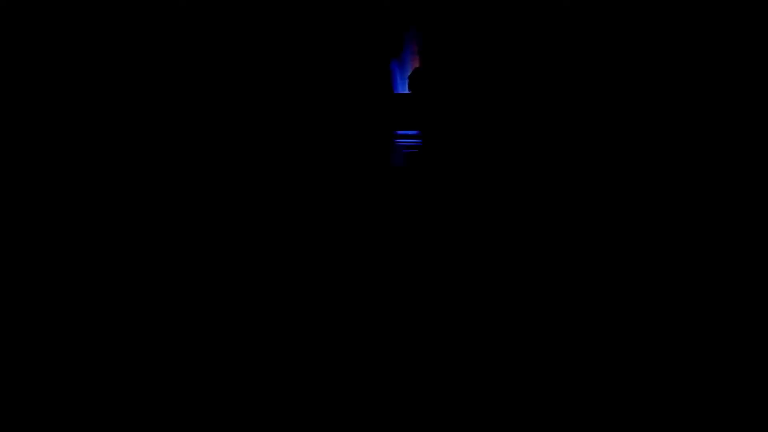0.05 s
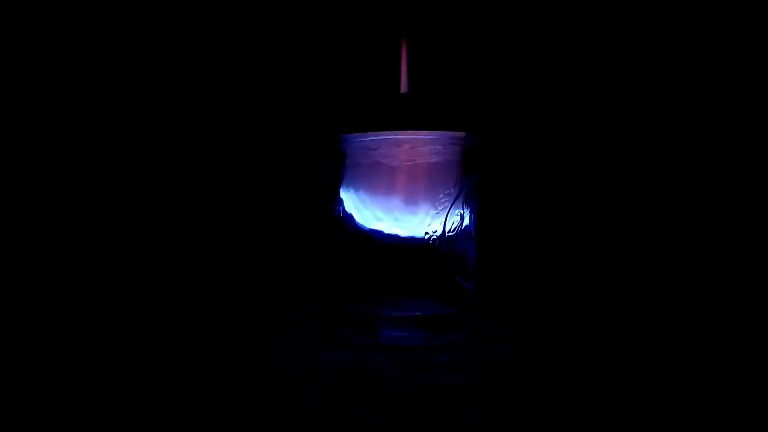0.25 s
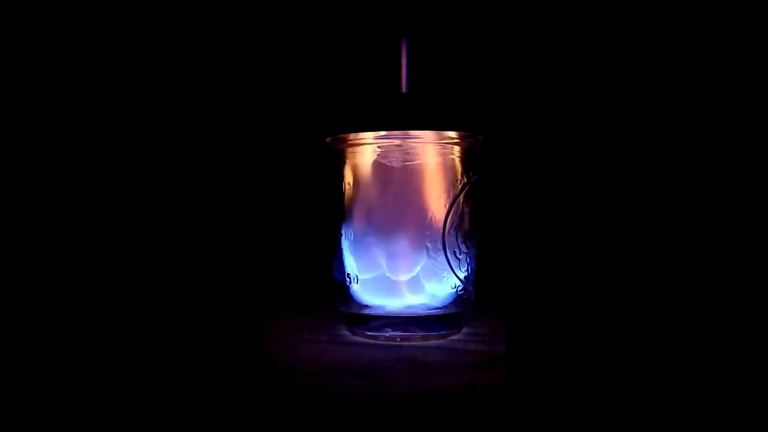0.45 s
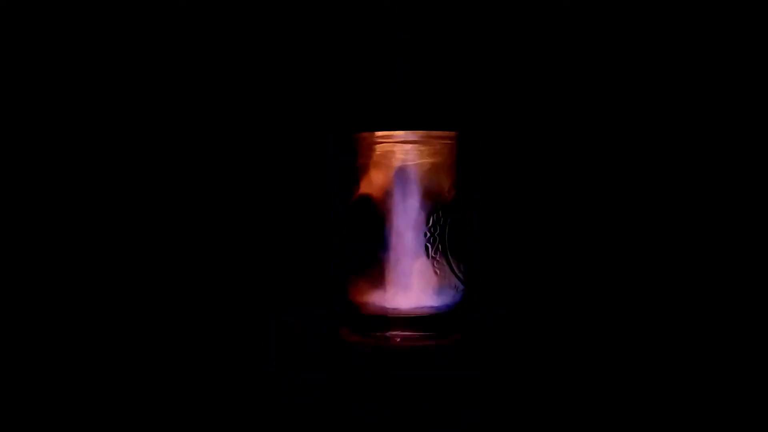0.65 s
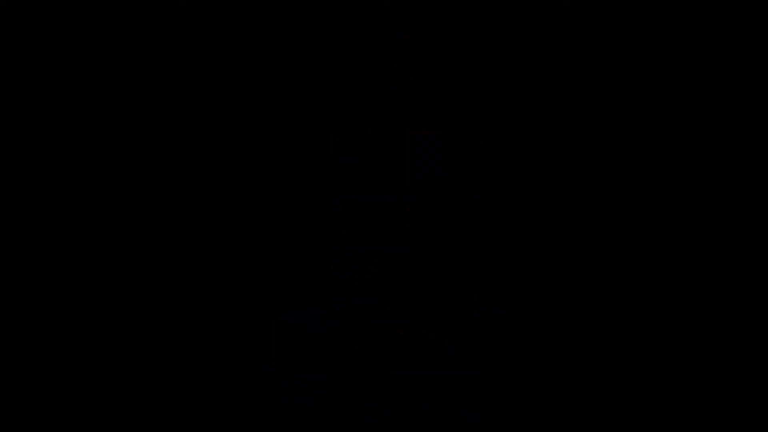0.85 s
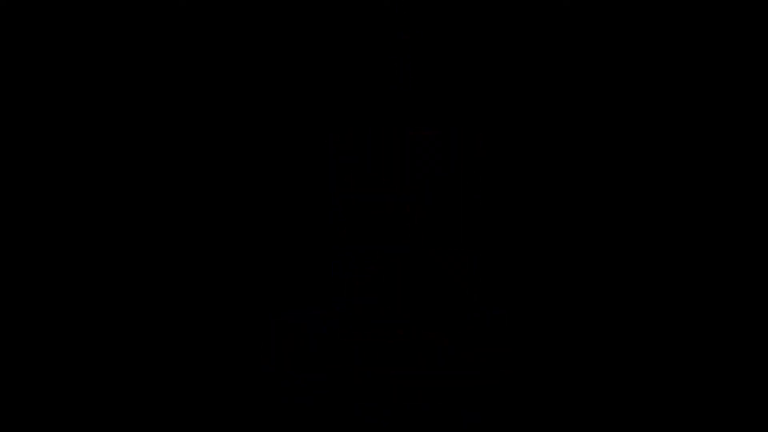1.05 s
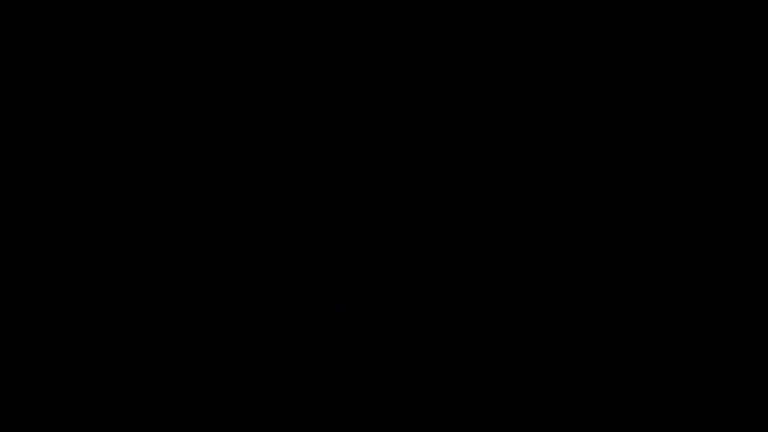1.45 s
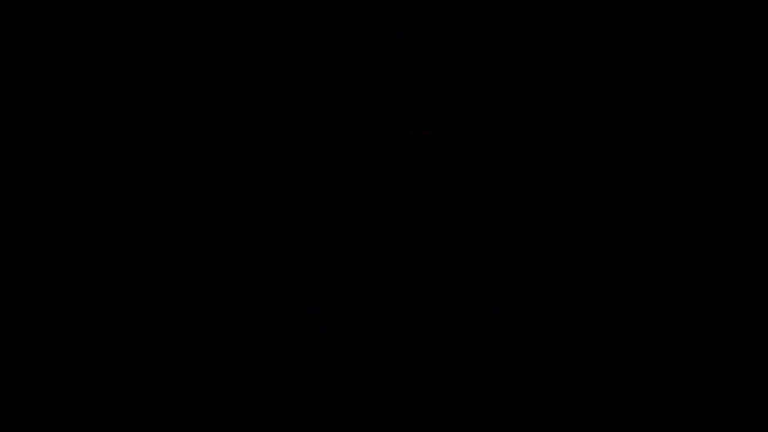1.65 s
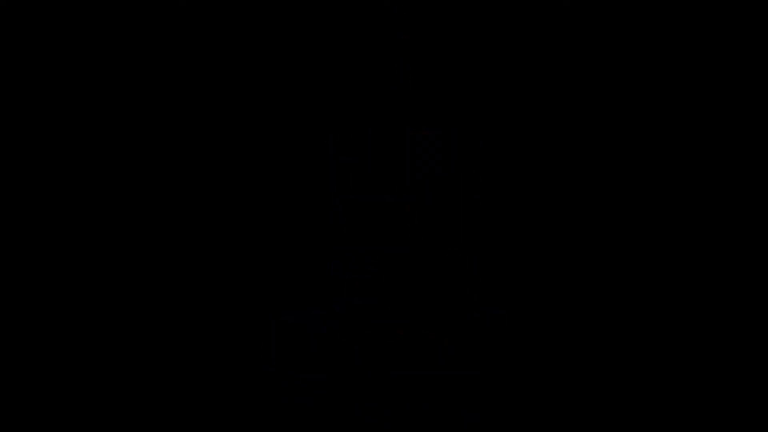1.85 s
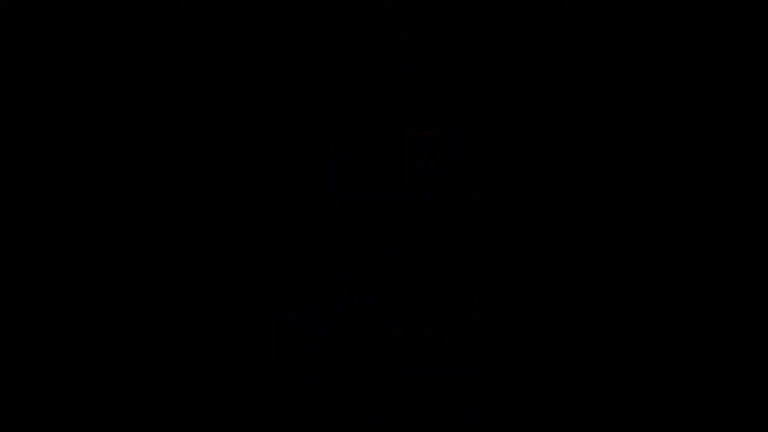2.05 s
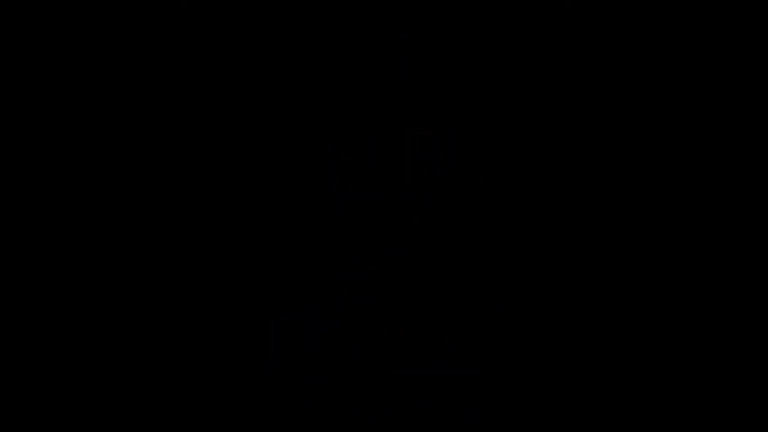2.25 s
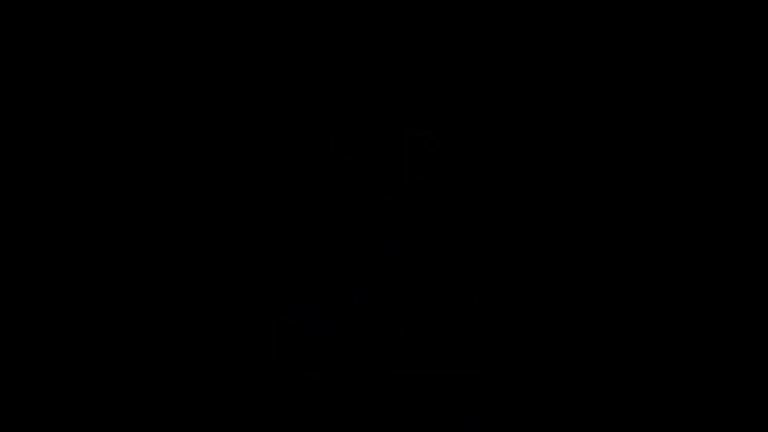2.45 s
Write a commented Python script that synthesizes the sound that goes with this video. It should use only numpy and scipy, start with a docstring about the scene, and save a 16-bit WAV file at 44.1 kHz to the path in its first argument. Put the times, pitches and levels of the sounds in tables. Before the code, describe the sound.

Close up in a quiet room, a flame whooshes out of a glass jar, roaring and hissing, then ends in a brief low hoot. The glass ticks faintly and air thumps and rumbles on the right microphone.

```python
"""Vapour ignites in a glass jar, close to a stereo recorder. The flame runs down the jar and drives a
roaring, hissing jet out of the mouth; the air in the jar then flutters, hoots in one arch of pitch and
rings out, and the cooling glass ticks. Puffs of air buffet the right microphone, mostly after the burn.
Behind it all lies a faint room hum that ducks under loud sound. The microphones are narrow-band and
feed a fast limiter."""
import sys
import numpy as np
from scipy import signal
from scipy.fft import rfft, irfft
from scipy.io import wavfile
from scipy.ndimage import uniform_filter1d, minimum_filter1d, map_coordinates

SR = 44100
rng = np.random.default_rng(int(sys.argv[2]) if len(sys.argv) > 2 else 0)


def transcribe(signal):
    """Save signal, clipped to [-1, 1], as a 16-bit WAV file at the path in sys.argv[1]."""
    frames = np.atleast_2d(signal).T
    limited = np.clip(frames, -1, 1)
    pcm = np.round(limited * 32767).astype(np.int16)
    wavfile.write(sys.argv[1], SR, pcm)


N = 110250

# spectra of the room tone and its high hiss: f/Hz, relative level/dB
ROOM_SPECTRUM = [(50, 0), (140, 1), (220, -14), (380, -13.5), (520, -26.5), (660, -12), (950, -28),
                 (1200, -18), (1450, -6), (1650, -8), (1900, -46), (5000, -34)]
AIR_SPECTRUM = [(1800, -26), (2500, -9.5), (3200, 1), (4200, 3), (5000, -3.5)]
# puffs on the microphone: t/s, thump f/Hz, thump level/dB, thump decay/s,
# rustle level/dB, rustle attack/s, rustle decay/s, tick level/dB
MIC_PUFFS = [(0.226, 105.6, -15, 0.019, -53, .01, 0.023, -61),
             (1.036, 58.4, -14, 0.3, -21.5, 0.015, 0.061, -40),
             (1.617, 82.8, -0.5, 0.019, -13.5, 0.0052, 0.02, -27),
             (1.673, 169, -4, 0.012, -17.5, 0.0043, 0.013, -63.5),
             (1.753, 47.8, -5.5, 0.043, -10, 0.00088, 0.011, -27),
             (1.82, 188, -9, 0.076, -37.5, 0.0067, 0.022, -66),
             (1.881, 56.2, -4.5, 0.058, -17.5, 0.0049, 0.0052, -47),
             (2.012, 89.7, -16.5, 0.053, -22, 0.014, 0.046, -59),
             (2.062, 84, -10, 0.049, -15.5, 0.003, 0.013, -63),
             (2.105, 36.35, -10, 0.13, -46, 0.0015, 0.0072, -34)]
# rumble of air on the right microphone: t/s, level/dB
RUMBLE_LEVELS = [(1.01, -55), (1.05, -11), (1.14, -13), (1.22, -23), (1.4, -30.5), (1.612, -55),
                 (1.63, -16.5), (1.73, -17), (1.78, -11.5), (1.92, -16.5), (1.985, -14.5), (2.1, -19.5),
                 (2.25, -24), (2.41, -31), (2.5, -29)]
# spectra of the rumble, eddies, rustle and ticks (of puffs and glass): f/Hz, relative level/dB
RUMBLE_SPECTRUM = [(15, -8), (30, 3.5), (55, -1), (85, -15.5), (130, -12.5), (300, -38), (600, -52.5),
                   (2000, -88.5)]
EDDY_SPECTRUM = [(60, 0.5), (130, 6), (240, -6.5), (400, -20.5), (800, -37), (2000, -56)]
RUSTLE_SPECTRUM = [(100, 0.5), (250, 5.5), (450, -5.5), (750, -13.5), (1200, -21.5), (1800, -36.5),
                   (3000, -43.5), (5000, -46)]
TICK_SPECTRUM = [(500, 1), (2000, 4.5), (4500, 3), (6000, 0)]
# resonances knocked by the hardest puff: f/Hz, half-width/Hz, relative level/dB
KNOCK_MODES = [(790, 200, 0), (1190, 99, -1.2)]
# ticks of the cooling glass: t/s, left level/dB, right level/dB
COOLING_TICKS = [(1.065, -44, -24), (1.191, -22.5, -42), (1.843, -58.5, -39.5)]
# spectrum of the wash left in room and jar: f/Hz, relative level/dB
WASH_SPECTRUM = [(80, -7.5), (170, 13.5), (330, 2.5), (450, 4), (600, -5), (1000, -5), (1500, -11),
                 (2500, -5), (5000, -20)]
# course of the hoot: t/s, f/Hz, left level/dB, right level/dB
HOOT_ARCH = [(.74, 158.3, -42, -32), (.812, 167.9, -39.5, -46), (.826, 174.7, -7.5, -19),
             (.842, 207.7, -8.5, -5), (.865, 264.2, -12, -13), (.89, 301.9, -13, -35),
             (.912, 335.7, -14, -17), (.938, 341.2, -12.5, -17.5), (.97, 338, -18, -23),
             (1.01, 281.1, -22, -24), (1.045, 227.1, -23, -23), (1.08, 174, -31, -23.5),
             (1.125, 140.3, -45.5, -22)]
# resonances colouring hoot and roar, the jar's higher air modes, and the resonances of the surge:
# f/Hz, half-width/Hz, relative level/dB
JAR_RESONANCES = [(490, 60, -13), (720, 45, -11), (1000, 70, -13), (1440, 35, -21), (1900, 35, -15),
                  (3450, 60, -20)]
HIGH_AIR_MODES = [(2700, 36, -8), (3024, 360, -4.5), (3275, 20, -2), (3326, 20, -4), (3733, 36, -6),
                  (3918, 43, 0), (4380, 8.1, -2), (4500, 12, 1.5), (4585, 17, -1.5)]
SURGE_MODES = [(1185, 1100, -4.5), (4580, 170, 6)]
# low flutter of the dying flame: t/s, level/dB
FLUTTER_LEVELS = [(.6, -32), (.67, -30.5), (.73, -21.5), (.78, -15.5), (.808, -12), (.83, -26),
                  (.87, -57.5)]
# hiss of the jet: t/s, left level/dB, right level/dB
HISS_LEVELS = [(.198, -70, -82), (.226, -21.5, -45), (.246, -11, -37), (.266, -9, -41), (.295, -9.5, -20),
               (.335, -8, -8.5), (.362, -5, -15), (.39, -9.5, -16), (.5, -8, -19.5), (.627, -6.5, -20),
               (.648, -13.5, -24), (.764, -16.5, -24), (.83, -28, -44), (.92, -31.5, -45),
               (1.02, -32.5, -43), (1.13, -40, -59.5), (1.4, -51, -62), (1.6, -55.5, -59)]
# spectra of the flutter, the hiss and the roar at each microphone: f/Hz, relative level/dB
FLUTTER_SPECTRUM = [(20, 2), (40, 4.5), (65, -5), (100, -2.5), (160, -4), (200, -9), (280, -32), (600, -36),
                    (2000, -31.5)]
HISS_SPECTRUM = [(300, -31.5), (1000, -17.5), (1900, -15.5), (2300, -11), (2700, -10), (3400, -2.5),
                 (4200, 0), (4700, 2), (5200, -11.5)]
LEFT_ROAR_SPECTRUM = [(25, 2), (100, -2.5), (300, -1.5), (700, -5.5), (1100, -6.5), (1600, -12.5),
                      (2300, -20.5), (5000, -26)]
RIGHT_ROAR_SPECTRUM = [(25, -13.5), (70, -13.5), (120, -5), (170, -3.5), (220, -2), (300, -16.5), (400, -8),
                       (560, -17), (1300, -9.5), (2300, -13), (5000, -20)]

IGNITE_S, BURNT_S, RISE_S, FALL_S = 0.2, 0.6286, 0.054, 0.0086


def undb(db):
    return 10 ** (np.asarray(db) / 20)


def seconds():
    return np.arange(N) / SR


def unit_rms(x):
    return x / np.sqrt(np.mean(x ** 2, axis=-1, keepdims=True))


def envelope(table, column=1):
    """Gain over time from a column of dB; silent before the table, fading out after it."""
    rows, t = np.array(table), seconds()
    gain = undb(np.interp(t, rows[:, 0], rows[:, column]))
    return gain * (t >= rows[0, 0]) * np.exp(-np.maximum(t - rows[-1, 0], 0) * 20)


def noise(spectrum):
    """Noise of rms 1 shaped by (f/Hz, level/dB) points, rolling off below the first."""
    hz, db = np.array(spectrum).T
    f = np.arange(N // 2 + 1) * SR / N + 1
    gain = undb(np.interp(np.log(f), np.log(hz), db)) * f ** 2 / (f ** 2 + (hz[0] / 2) ** 2)
    return unit_rms(irfft(rfft(rng.standard_normal(N)) * gain, N))


def resonance_gain(f, modes, shift=1):
    """Gain at f of a set of resonances, their centres multiplied by shift."""
    return sum(undb(db) / (1 + ((f - hz * shift) / width) ** 2) for hz, width, db in modes)


def ringing(modes):
    """Noise of rms 1 ringing in a set of resonances."""
    f = np.arange(N // 2 + 1) * SR / N + 1
    return unit_rms(irfft(rfft(rng.standard_normal(N)) * resonance_gain(f, modes), N))


def wander(rate_hz):
    """Smooth random motion of rms 1."""
    hold = max(int(SR / rate_hz), 1)
    steps = np.repeat(rng.standard_normal(N)[:N // hold + 1], hold)
    return unit_rms(uniform_filter1d(uniform_filter1d(steps, hold), hold)[:N])


def burst(start_s, attack_s, decay_s):
    """Straight rise, then exponential fall."""
    age = seconds() - start_s
    return np.clip(age / attack_s, 0, 1) * np.exp(-np.maximum(age - attack_s, 0) / decay_s)


def room_tone(hum_hz=632, swell_db_per_s=1.77):
    """Faint room noise with a thin hum and a high hiss to the left, slowly growing louder."""
    hum_gain = undb(-64 + wander(10))
    hum = hum_gain * np.sin(2 * np.pi * np.cumsum(hum_hz * (1 + .002 * wander(20))) / SR)
    room = [undb(-51.5) * noise(ROOM_SPECTRUM) + undb(air_db) * noise(AIR_SPECTRUM) + hum
            for air_db in (-52.5, -65.5)]
    return np.array(room) * undb(swell_db_per_s * seconds())


def ducking(sound, threshold_db=-13, release_s=0.081):
    """Gain that drops at once under loud peaks and recovers slowly."""
    fade = np.exp(-seconds() / release_s)
    held_peak = np.maximum.accumulate(np.abs(sound).max(axis=0) / fade) * fade
    return 1 / np.hypot(1, held_peak / undb(threshold_db))


def buffeting(sag_per_s=5.1, sag_limit=0.67, thump_attack_s=0.0069):
    """Air hits the right microphone: over a rumble, each puff ticks, rustles and thumps."""
    t = seconds()
    low = noise(RUMBLE_SPECTRUM) * envelope(RUMBLE_LEVELS)
    wobble = 1 + .06 * wander(110)
    eddies = undb(-12.5) * noise(EDDY_SPECTRUM)
    rustle = tick = 0
    for start, hz, thump_db, thump_decay, rustle_db, rustle_attack, rustle_decay, tick_db in MIC_PUFFS:
        pitch_sag = 1 - sag_limit * np.tanh(sag_per_s * (t - start) / sag_limit)
        swing = np.sin(2 * np.pi * np.cumsum(hz * pitch_sag * wobble * (t > start)) / SR)
        thump = burst(start, thump_attack_s, thump_decay) * swing
        swirl = burst(start, thump_attack_s, decay_s=0.029) * eddies
        low = low - undb(thump_db) * (thump + swirl)
        rustle += undb(rustle_db) * burst(start, rustle_attack, rustle_decay)
        tick += undb(tick_db) * burst(start, rustle_attack, decay_s=0.0061)
    left, right = (rustle * noise(RUSTLE_SPECTRUM) + tick * noise(TICK_SPECTRUM) for _ in range(2))
    puffs = np.array([undb(-25) * low + undb(-11) * left, low + right])  # a little leaks to the left
    knock = burst(1.7545, 0.00067, 0.0049) * ringing(KNOCK_MODES)  # the hardest puff
    return puffs + undb([[-32.5], [-15]]) * knock


def glass_ticks():
    """The cooling glass ticks faintly."""
    return sum(undb([[left_db], [right_db]]) * burst(start, 0.00074, 0.003) * noise(TICK_SPECTRUM)
               for start, left_db, right_db in COOLING_TICKS)


def ring_out(wash_peak_s=0.93, wash_fade_db_per_s=36.5, ring_hz=321, ring_fade_db_per_s=45.5):
    """A weak wash in the room and the jar's lowest air note die away."""
    t = seconds()
    build = np.clip((t - IGNITE_S) / (wash_peak_s - IGNITE_S), 0, 1) ** 2
    wash = build * undb(-27 - wash_fade_db_per_s * np.maximum(t - wash_peak_s, 0))
    ring = undb(-24) * burst(0.888, RISE_S, decay_s=20 / np.log(10) / ring_fade_db_per_s)
    return np.array([wash * noise(WASH_SPECTRUM) + ring * ringing([(ring_hz, 19, 0)]) for _ in range(2)])


def hoot(right_lag_s=0.00129, octave_db=-21, flicker_db=2.2, purify_db_per_s=28.5):
    """The jar's air oscillates: raspy at first, purer as the pitch arches up and falls back."""
    t, arch = seconds(), np.array(HOOT_ARCH)
    hz = uniform_filter1d(np.interp(t, arch[:, 0], arch[:, 1]), size=700) * (1 + .005 * wander(150))
    left_phase = 2 * np.pi * np.cumsum(hz) / SR
    brightness = undb(-purify_db_per_s * np.maximum(t - 0.69, 0))
    shift = (hz / arch[:, 1].mean()) ** .07  # the resonances rise a little with the pitch
    channels = []
    for side, rasp_db in enumerate((-22, -28.1)):
        phase = left_phase - side * 2 * np.pi * hz * right_lag_s
        tone = np.sin(phase)
        for k in range(2, 20):
            resonant = brightness * resonance_gain(k * hz, JAR_RESONANCES, shift)
            steady = undb(octave_db) / (k - 1) ** 2
            tone += (resonant + steady) * np.sin(k * phase + rng.uniform(0, 2 * np.pi))
        # noise in the same shifting resonances, pulsing with each cycle
        breath = map_coordinates(ringing(JAR_RESONANCES), [np.cumsum(shift)], mode="mirror")
        rasp = breath * (1 + .5 * np.cos(phase)) * burst(.818, 0.012, .05) * undb(rasp_db)
        level = undb(flicker_db * wander(110)) * envelope(HOOT_ARCH, column=side + 2)
        channels.append(np.sqrt(2) * tone * level + rasp)
    return np.array(channels)


def jet(swell_db_per_s=6.5, turbulence_db=1.79, surge_s=0.343, surge_half_s=0.043):
    """Hot gas roars out ever harder as the flame travels down; its hiss rings the jar and lingers."""
    t = seconds()
    burning = np.clip((t - IGNITE_S) / RISE_S, 0, 1) ** 2 * np.exp(-np.maximum(t - BURNT_S, 0) / FALL_S)
    swell_db = swell_db_per_s * (t - IGNITE_S)
    surging = np.exp(-((t - surge_s) / surge_half_s) ** 2)  # a bright surge early in the burn
    roar_db, surge_db = (-14.5, -21.5), (-14, -13)  # left, right
    channels = []
    for side, spectrum in enumerate((LEFT_ROAR_SPECTRUM, RIGHT_ROAR_SPECTRUM)):
        body = unit_rms(noise(spectrum) + undb(-9.5) * ringing(JAR_RESONANCES[:3]))
        roar = body * burning * undb(roar_db[side] + swell_db + turbulence_db * wander(90))
        surge = ringing(SURGE_MODES) * surging * undb(surge_db[side])
        hiss = unit_rms(noise(HISS_SPECTRUM) + undb(-5) * ringing(HIGH_AIR_MODES))
        hiss *= undb(1.3 * wander(150)) * envelope(HISS_LEVELS, column=side + 1)
        flutter = noise(FLUTTER_SPECTRUM) * envelope(FLUTTER_LEVELS)
        channels.append(roar + surge + hiss + flutter)
    return np.array(channels)


def scene():
    """The jar up close and the air on the microphones, with the room ducking behind them."""
    near = jet() + hoot() + ring_out() + glass_ticks() + buffeting()
    return near + room_tone() * ducking(near)


def record(dry):
    """Narrow-band microphones, fast limiter; loud swings round into a sizzle, the highest clip."""
    band_hz, skirt_hz, top_hz = 4837, 5600, 14500
    ceiling, rounding = 1.1, .055
    band = signal.sosfilt(signal.ellip(9, .3, 75, band_hz, fs=SR, output="sos"), dry)
    skirt = signal.sosfilt(signal.butter(3, (band_hz, skirt_hz), "bandpass", fs=SR, output="sos"), dry)
    mic = band + undb(-24) * skirt
    gain = minimum_filter1d(ceiling / np.maximum(np.abs(mic), ceiling), size=25)
    limited = mic * uniform_filter1d(gain, size=25)
    rounded = np.clip(limited * (1 - rounding * limited ** 2), -1, 1)
    return signal.sosfilt(signal.ellip(8, .2, 70, top_hz, fs=SR, output="sos"), rounded)


dry = scene()
out = record(dry)
transcribe(out)
```